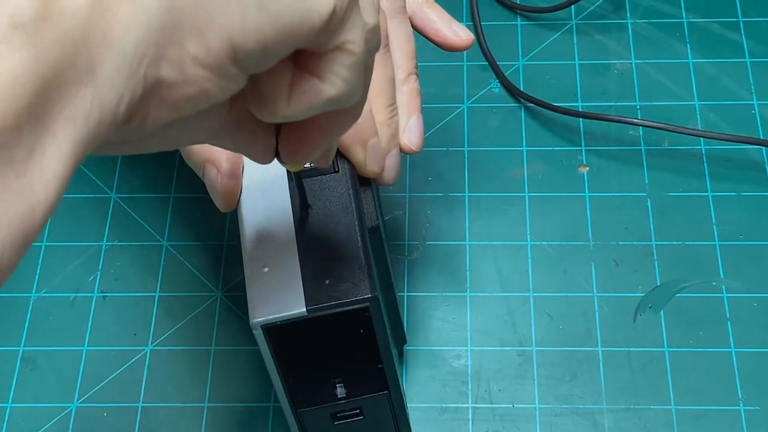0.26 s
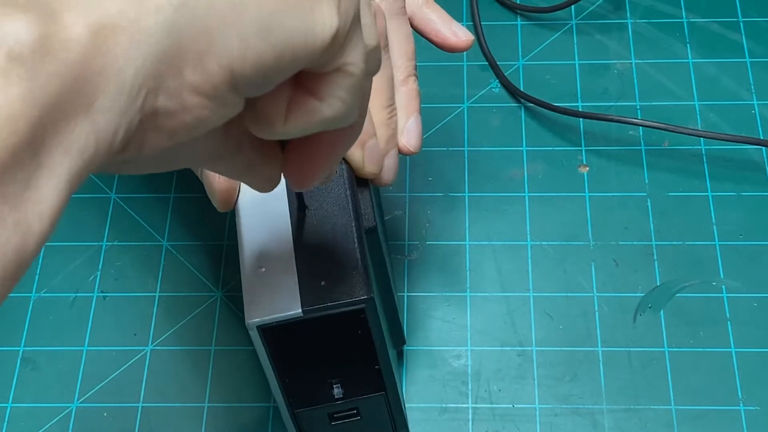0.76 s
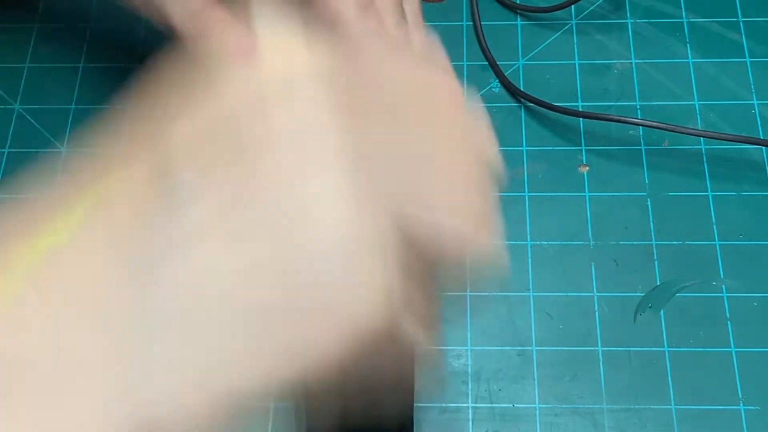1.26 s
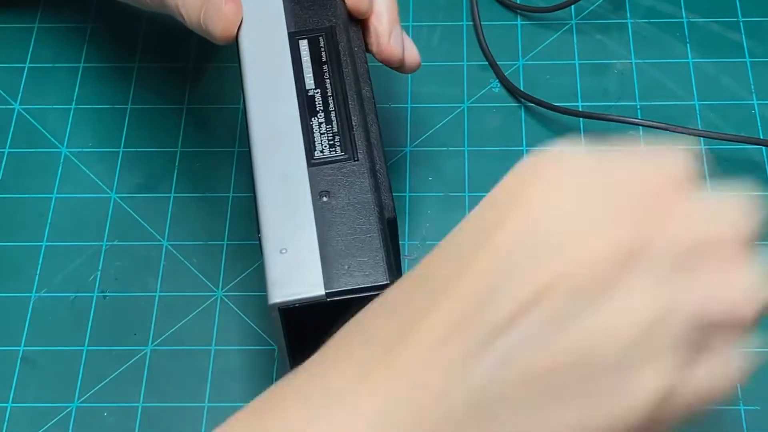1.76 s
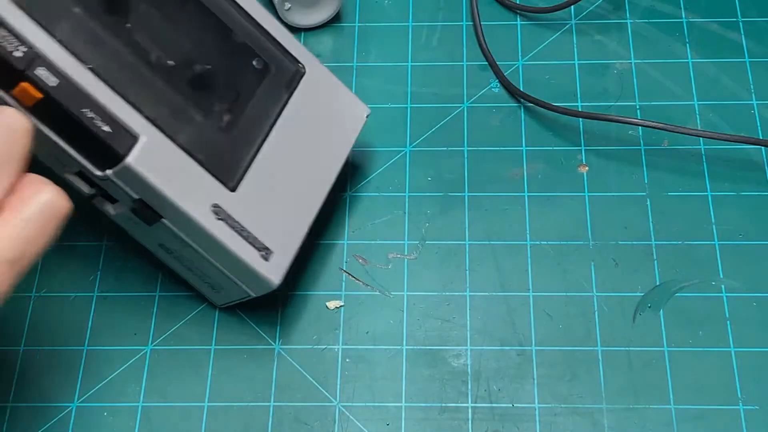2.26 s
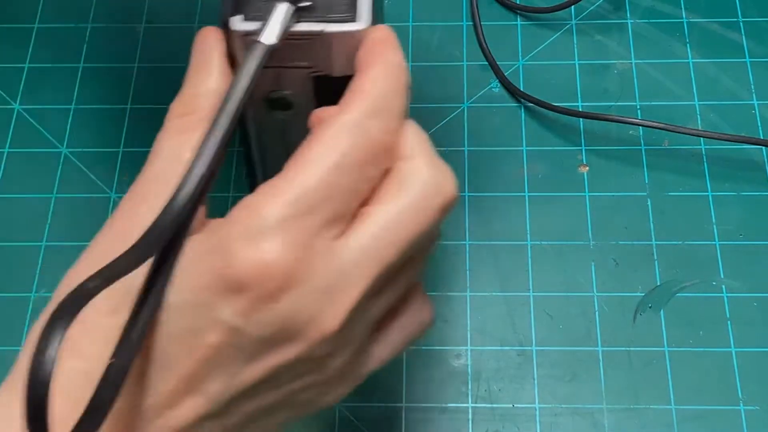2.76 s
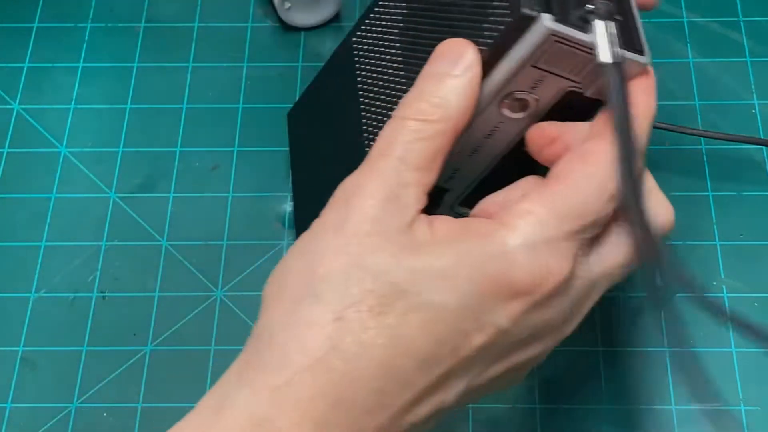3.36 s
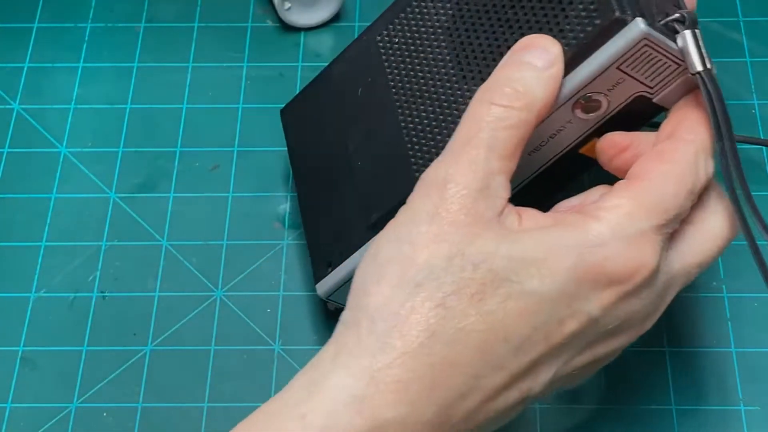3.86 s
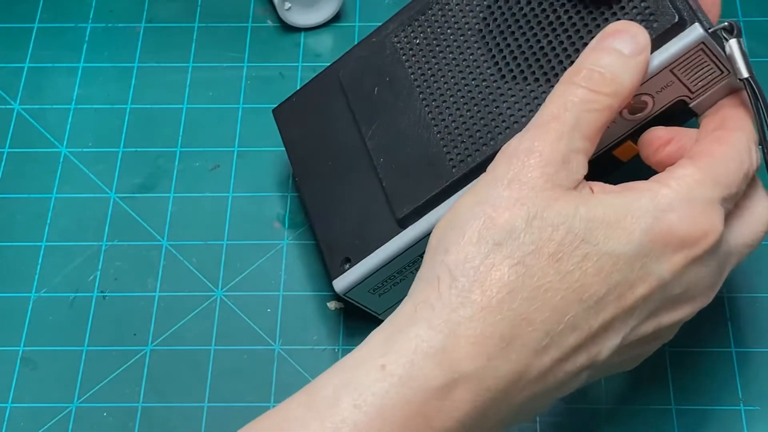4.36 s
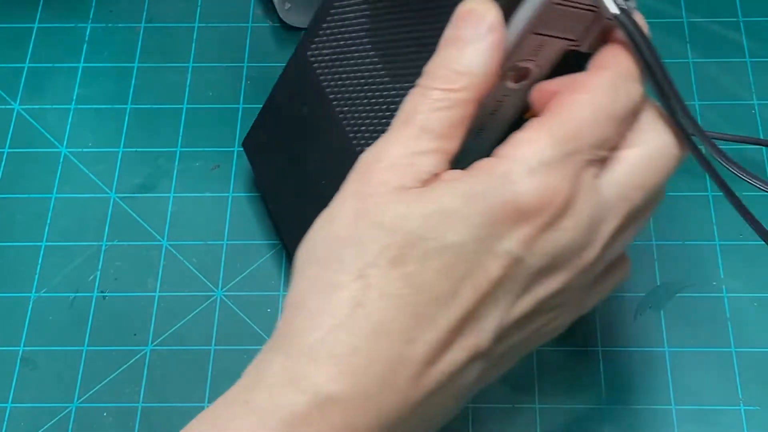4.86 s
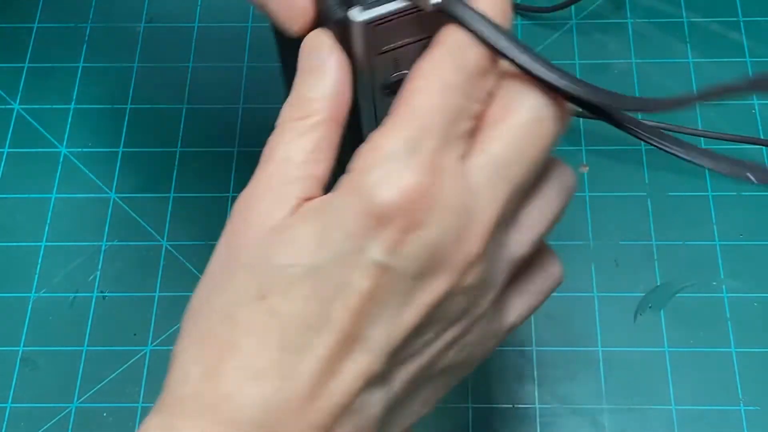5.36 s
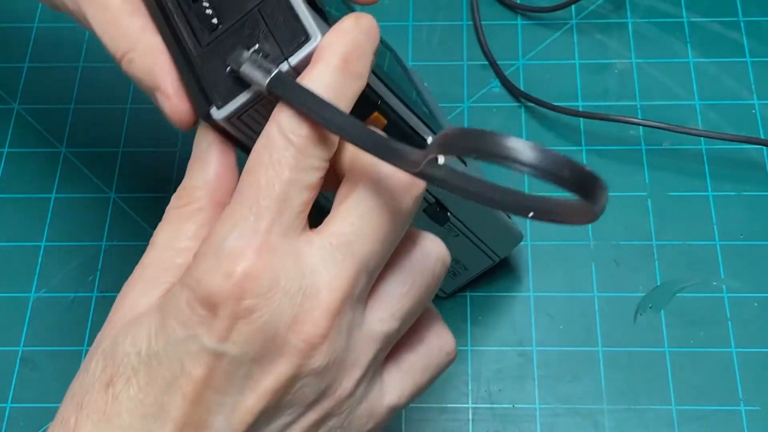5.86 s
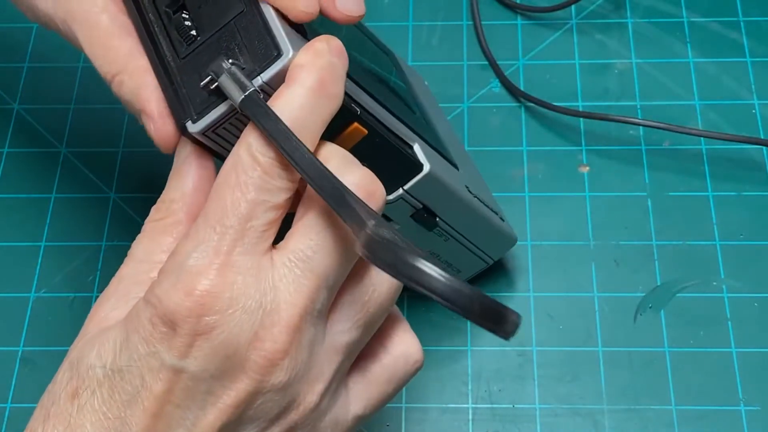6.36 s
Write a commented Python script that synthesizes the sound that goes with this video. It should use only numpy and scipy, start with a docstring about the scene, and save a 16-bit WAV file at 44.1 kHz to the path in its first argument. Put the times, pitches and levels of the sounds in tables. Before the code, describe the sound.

A plastic case clicks, knocks and rubs as it is handled on a workbench, and a screwdriver is set down with a brief ring.

```python
"""A plastic case, a screwdriver and screws click and knock as they are handled on a rubber mat on a bench.
Each impact excites the damped modes of the shell; the screwdriver lands once and its steel rings on.
The wooden bench top thuds under the weight, and sliding fingers and plastic make friction noise.
The small, quiet room adds a short reverberation and a hush. A phone just above the bench hears it all
through two ports, the treble reaching the right side about ten samples early and inverted."""
import sys
import numpy as np
from scipy import signal
from scipy.fft import rfft, irfft, next_fast_len
from scipy.io import wavfile
from scipy.ndimage import uniform_filter1d

SR = 44100
rng = np.random.default_rng(int(sys.argv[2]) if len(sys.argv) > 2 else 0)


def wrap_up_sound(samples):
    """Save the sound to the file named by the first command line argument, as 16-bit audio."""
    columns = np.atleast_2d(samples).T
    # keep every value between -1 and 1, then stretch to whole-number steps
    tamed = np.clip(columns, -1, 1)
    steps = np.round(tamed * 32767).astype(np.int16)
    wavfile.write(sys.argv[1], SR, steps)


N = 291942
PADDED = next_fast_len(N)

# impacts on the case; the hollow, crack and spot levels are relative to the mid-band peak
# (t/s, mid-band peak level/dB, hollow level/dB, crack level/dB, rattle T60/s, spot f/Hz, spot level/dB)
IMPACTS = [(0.944, -38.5, -39, 4, 0.026, 1810, -22), (1.076, -39.5, -2, 6, 0.056, 1160, -12.5),
           (1.1033, -36, -5.5, 13.5, 0.02, 1200, -9), (1.1302, -36, -2.5, 6, 0.033, 2050, -11),
           (1.1769, -34.5, -8, -8, 0.03, 2180, -3), (1.2972, -46, -15, 20, 0.012, 2770, -10),
           (1.4639, -44.5, -4.5, 0, 0.26, 3160, -0.5), (1.4961, -10, -3.5, -2.5, 0.055, 3900, -13),
           (1.5338, -13, 2, -22, 0.053, 1016, -1.5), (1.5427, -5, -4.5, 7, 0.031, 970, -9.5),
           (1.6635, -42, -2, -3, 0.074, 330, -2.5), (2.1489, -38, -0.5, 1.5, 0.061, 996, 1.5),
           (2.5158, -21, -25, 16.5, 0.037, 1260, 2.5), (2.523, -29, -3.5, -21, 0.06, 1263, 13.5),
           (2.5481, -29, -7, -29, 0.027, 1107, 3), (2.6319, -45.5, -39, -22.5, 0.12, 1300, 5),
           (2.7694, -41, 8.5, -7, 0.043, 1240, -6), (2.786, -47.5, 6, -32.5, 0.06, 193.3, 12),
           (3.022, -62, -14.5, -16, 0.031, 947, -1), (3.2079, -61.5, -13, -22, 0.026, 1640, 6),
           (3.3273, -43.5, -26.5, -16, 0.027, 2460, -1), (3.4152, -36, -22.5, -13.5, 0.033, 2093, -6.5),
           (3.9155, -48.5, -15.5, 3, 0.046, 1660, 1.5), (4.3406, -58.5, 11, -34.5, 0.05, 621, 6.5),
           (4.3606, -57.5, 11.5, -35.5, 0.04, 630, 11.5), (4.3745, -58, 8.5, -35, 0.04, 690, 10),
           (4.3850, -63.5, 8, -26, 0.04, 640, 12), (4.3945, -63, 12, -31, 0.025, 402, 8.5),
           (4.4596, -61, 4.5, -13, 0.028, 623, -4), (4.8881, -42, -10.5, 9.5, 0.024, 1980, -14),
           (5.1201, -55, 12, -31, 0.036, 645, 12.5), (5.3614, -40, 2.5, -29, 0.045, 1330, -1),
           (5.3711, -20, -5, -9, 0.045, 1300, -3), (5.6259, -31, -19, 9, 0.016, 2740, -6.5),
           (5.7305, -56.5, -1.5, -30.5, 0.039, 1330, 8), (5.7513, -53.5, -14, -26.5, 0.023, 1080, 7.5),
           (5.9544, -49.5, -21, -21, 0.026, 1430, 2), (6.0068, -46.5, -15, -37, 0.037, 1866, 2),
           (6.171, -59, -16.5, -27, 0.042, 1574, 12.5), (6.2603, -32.5, -14.5, 9.5, 0.025, 2630, -7.5)]
# resonances of the plastic shell (f/Hz, bandwidth/Hz, level/dB)
SHELL_MODES = [(420, 180, 0), (1003, 210, 6), (1336, 140, 4), (1602, 140, 2.5), (1890, 150, 1),
               (2210, 290, -2), (2699.5, 230, 0.5), (3320, 620, -5.5), (4050, 300, -5), (4869, 1300, -9.5),
               (6670, 630, -16), (6850, 900, -18)]
# bright bands of a hard contact (f/Hz, bandwidth/Hz, level/dB)
CONTACT_BANDS = [(9240, 2400, 2), (13000, 670, -2.5)]
# mode clusters of the steel screwdriver (f/Hz, level/dB, T60/s)
STEEL_MODES = [(3000, -8, .4), (5780, -4, .9), (7300, -7, .6), (8400, -6, .8), (9100, 2, .3),
               (10350, -5, .95), (11800, -6, .6), (12900, -3, .8)]
LANDING_S = (1.48, 1.56)  # the impacts in this span ring the screwdriver
# thuds of the bench top (t/s, peak level/dB, f/Hz, T60/s, rise/s)
THUDS = [(0.083, -45.5, 103.7, 0.165, 0.036), (0.222, -51, 82, 0.17, 0.0063),
         (0.486, -52, 74.6, 0.09, 0.0083), (0.559, -54.5, 72.5, 0.14, 0.0096),
         (1.157, -48, 85.85, 0.15, 0.022), (1.199, -49.5, 79.4, 0.17, 0.008),
         (1.366, -51.5, 53.52, 0.2, 0.011), (1.496, -38, 140.8, 0.45, 0.017),
         (1.536, -28.5, 143.1, 0.17, 0.0079), (1.66, -46.5, 87, 0.13, 0.0033),
         (1.761, -59, 68.4, 0.07, 0.0079), (2.408, -49.5, 58.5, 0.25, 0.01), (2.541, -35, 70.8, 0.1, 0.02),
         (2.735, -28.5, 76.65, 0.054, 0.016), (2.784, -25, 99.5, 0.15, 0.0075),
         (3.921, -49, 80.3, 0.22, 0.01), (5.379, -24, 82.24, 0.185, 0.0076), (5.409, -28, 58, 0.13, 0.014),
         (5.71, -61.5, 56.5, 0.15, 0.011)]
# resonances of the bench (f/Hz, bandwidth/Hz, level/dB)
BENCH_MODES = [(59.4, 38, 5), (90, 30, -2), (162, 27, -15.5)]
# rubbing strokes and, at 1.6 and 1.732 s, the noisy fading tail of the screwdriver's landing
# (t/s at full level, 20 dB rise/s, hold/s, 20 dB fall/s, scrape level/dB, hiss level/dB, rumble level/dB)
SWELLS = [(0.0, .01, .002, 0.044, -60.5, -56, -56), (0.124, 0.086, 0.11, .1, -73, -76.5, -70.5),
          (1.07, 0.013, 0.12, 0.089, -54.5, -54, -49.5), (1.183, 0.08, 0.021, 0.26, -60.5, -42, -50),
          (1.337, 0.078, 0.034, 0.25, -67, -62, -68), (1.6, .02, 0.065, 0.11, -51.5, -57, -59),
          (1.732, 0.056, 0.08, 0.28, -58.5, -64, -56), (2.13, 0.085, 0.031, .07, -63, -64, -61),
          (2.403, 0.082, 0.14, 0.033, -66.5, -59, -58.5), (2.588, 0.052, 0.073, 0.3, -54.5, -57, -50),
          (2.84, 0.024, .04, 0.11, -66, -55, -57), (3.025, 0.038, 0.0049, .1, -64.5, -78.5, -64),
          (3.198, 0.033, 0.0044, .08, -68, -88.5, -65), (3.327, 0.046, 0.0059, 0.053, -57.5, -58, -52.5),
          (3.918, .03, 0.026, 0.066, -56, -56, -60.5), (4.221, 0.039, 0.12, .08, -73.5, -71.5, -81),
          (4.36, 0.048, .005, 0.068, -72.5, -80.5, -60.5), (4.993, 0.039, 0.0053, 0.054, -76, -59, -74),
          (5.125, 0.077, .005, 0.057, -68.5, -77, -67), (5.277, 0.028, 0.068, .05, -42.5, -55.5, -70),
          (5.332, 0.041, 0.0043, 0.016, -39, -47, -50), (5.38, 0.0082, 0.033, 0.04, -32, -44.5, -34.5),
          (5.44, 0.026, 0.016, .05, -38, -63, -52), (5.6, 0.11, 0.02, 0.025, -65.5, -75.5, -60.5),
          (5.732, 0.027, .005, 0.12, -66, -80.5, -59), (5.8, .05, 0.084, .05, -71.5, -76.5, -66.5),
          (6.007, .03, 0.0054, 0.038, -57, -87, -58), (6.334, 0.054, .01, .07, -61.5, -60, -68),
          (6.605, 0.13, 0.018, .1, -67, -79, -75)]
SETTLE_DB, SETTLE_FALL_S = (-21, -27.5, -28), 0.058  # scrape, hiss and rumble relative to an impact
SHAKE_DB, SHAKE_FALL = -4.5, 0.21  # rumble relative to a thud; fall as a fraction of its T60
# reverberation time of the room (f/Hz, T60/s)
ROOM_T60 = [(100, 0.047), (300, 0.44), (1000, 0.078), (4000, 0.25), (12000, 0.14)]
# spectral density of the hush (f/Hz, relative level/dB)
HUSH_SPECTRUM = [(18, -33.5), (30, -5.5), (114, -7), (220, -18), (435, -16.5), (796, -21.5), (908, -23),
                 (1240, -25), (11000, -33.5), (13500, -35), (15800, -37.5)]
# phase lag of the right port; above 5 kHz it is about ten samples early and inverted (f/Hz, phase/rad)
PORT_PHASE = [(0, 0), (950, .4), (1700, -1.1), (3050, 1.7), (4300, 0), (5000, -3.5), (16000, -19.2)]
# likeness of the two ports (f/Hz, coherence from 0 to 1)
PORT_COHERENCE = [(100, .98), (300, .92), (700, .62), (3000, .6), (5300, .7), (7000, .99)]
# level difference between the ports (f/Hz, left minus right level/dB)
PORT_BALANCE = [(200, -.5), (600, 2), (1300, 3.3), (2500, 2.8), (5000, .8), (8000, 0)]


def case_clicks(size=4096, rise_s=.0008, first_touch=3.1):
    """Impact excitation: a rattle of contacts drives the shell's modes; hard contact adds treble."""
    t, hz = np.arange(size) / SR, bins(size)
    clicks, landing = np.zeros((2, PADDED + size))
    for start_s, db, hollow_db, crack_db, t60, spot_hz, spot_db in IMPACTS:
        # a soft contact starts more slowly and touches more weakly
        onset = 1 - np.exp(-t / (rise_s * undb(-0.3 * crack_db)))
        rattle = rng.standard_normal(size) * onset * undb(-60 * (t / max(t60, .003)) ** 0.75)
        rattle[8] += first_touch * undb(min(crack_db, 0) / 2)
        # each struck spot drives the modes in its own proportions
        shell = resonances(SHELL_MODES, hz, 3 * rng.standard_normal((len(SHELL_MODES), 1)))
        hollow = filtered(rattle, shell * lowpass(hz, 1100))
        mid = filtered(rattle, shell * highpass(hz, 1200) * lowpass(hz, 14000 * undb(0.4 * crack_db)))
        spot = filtered(rattle, resonances([(spot_hz, 0.1 * spot_hz, 0)], hz))
        treble = highpass(hz, 8800) / (1 + (hz / 15000) ** 8)
        crack = filtered(rattle, treble * (1 + resonances(CONTACT_BANDS, hz)))
        parts = (hollow, hollow_db), (mid, 0), (spot, spot_db), (crack, crack_db)
        click = sum(undb(db + part_db) * part / np.abs(part).max() for part, part_db in parts)
        i = int(start_s * SR)
        clicks[i:i + size] += click
        if LANDING_S[0] < start_s < LANDING_S[1]:
            landing[i:i + size] += click
    return clicks[:PADDED] + screwdriver_ring(landing[:PADDED])


def screwdriver_ring(blows, gain_db=-24, spread=.013):
    """Beating: the blows excite clusters of closely spaced steel modes, which shimmer as they decay."""
    t, ring = np.arange(SR // 2) / SR, 0
    for hz, db, t60 in STEEL_MODES:
        cluster_hz = hz * (1 + spread * rng.standard_normal((10, 1)))
        ring = ring + undb(db - 60 * t / t60) * np.sin(2 * np.pi * cluster_hz * t).sum(axis=0)
    return undb(gain_db) * convolved(blows, ring)


def bench_thuds(size=16384, sag=0.02):
    """Damped oscillation: soft pushes swing the bench top, its pitch sagging slightly at the start."""
    thuds, t = np.zeros(PADDED + size), np.arange(size) / SR
    for start_s, db, hz, t60, rise_s in THUDS:
        cycles = np.cumsum(hz * (1 + sag * np.exp(-t / 0.007))) / SR
        swing = (1 - np.exp(-t / max(rise_s, .002))) * undb(-60 * t / max(t60, .03))
        i = int(start_s * SR)
        thuds[i:i + size] += undb(db) * swing / swing.max() * np.sin(2 * np.pi * cycles)
    return thuds[:PADDED]


def handling_noise():
    """Sliding friction: uneven slips scrape and hiss, the bench rumbles; also the landing's noisy tail."""
    hz = bins(PADDED)
    slips = rng.standard_normal(PADDED) * undb(1.2 * rng.exponential(size=PADDED) + 1.5 * waver(80))
    shell = resonances(SHELL_MODES, hz)
    # sustained rubbing lets the modes build up and stand out
    emphasis = np.abs(shell * undb(3.0 * np.log2(hz / 1000))) ** 0.6
    scrape = unit_rms(filtered(slips, shell * emphasis * highpass(hz, 700) ** 2))
    treble = highpass(hz, 7000) * (1 + 0.5 * resonances([(11300, 3000, 0.0075)], hz))
    hiss = unit_rms(filtered(slips, treble))
    bench = resonances(BENCH_MODES, hz) * lowpass(hz, 250)
    rumble = unit_rms(filtered(rng.standard_normal(PADDED), bench))
    scrape_gain, hiss_gain, rumble_gain = handling_envelopes()
    return scrape_gain * scrape + hiss_gain * hiss + rumble_gain * rumble


def handling_envelopes():
    """Incoherent addition: the swells, parts sliding to rest and the shaken bench sum in power."""
    settles = [(s + 0.0027, .004, 0, SETTLE_FALL_S, *np.add(db, SETTLE_DB)) for s, db, *_ in IMPACTS]
    shakes = [(s + rise_s, rise_s, .012, SHAKE_FALL * t60, -np.inf, -np.inf, db + SHAKE_DB)
              for s, db, _, t60, rise_s in THUDS]
    power = np.zeros((3, PADDED))
    for peak_s, rise_s, hold_s, fall_s, *levels_db in SWELLS + settles + shakes:
        first = max(int((peak_s - 3 * rise_s) * SR), 0)
        last = min(int((peak_s + hold_s + 3 * fall_s) * SR), PADDED)
        t = np.arange(first, last) / SR - peak_s
        drop_db = 20 * np.maximum(np.maximum(-t / rise_s, (t - hold_s) / fall_s), 0)
        power[:, first:last] += undb(np.array(levels_db)[:, None] - drop_db) ** 2
    return np.sqrt(power)


def reverberation(direct, gain_db=-8, rise_s=0.0017):
    """Diffuse field: each octave band of the room's noise-like tail decays at its own rate."""
    t = np.arange(SR // 2) / SR
    hz, tail = bins(len(t)), 0
    for centre_hz in 125 * 2. ** np.arange(8):
        band = filtered(rng.standard_normal(len(t)), np.exp(-2 * np.log2(hz / centre_hz) ** 2))
        tail = tail + band * undb(-60 * t / curve(ROOM_T60, centre_hz))
    return undb(gain_db) * convolved(direct, tail * (1 - np.exp(-t / rise_s)))


def hush(level_db=-65.5):
    """Noise floor: room and microphone give a steady broadband hush whose bass wavers."""
    hz = bins(PADDED)
    noise = unit_rms(filtered(rng.standard_normal(PADDED), undb(curve(HUSH_SPECTRUM, hz))))
    bass = filtered(noise, 1 / (1 + (hz / 250) ** 2))
    return undb(level_db) * (noise - bass + bass * undb(2.5 * waver(6)))


def resonances(modes, hz, extra_db=0):
    """Modal superposition: second-order resonators sum, neighbours in opposite sign."""
    centre, width, db = np.transpose(modes)[:, :, None]
    gain = undb(db + extra_db) * (-1.) ** np.arange(len(centre))[:, None]
    return np.sum(gain * 1j * hz * width / (centre ** 2 - hz ** 2 + 1j * hz * width), axis=0)


def highpass(hz, edge_hz):
    """Critically damped second-order high-pass response."""
    return (1j * hz / (edge_hz + 1j * hz)) ** 2


def lowpass(hz, edge_hz):
    """Critically damped second-order low-pass response."""
    return 1 / (1 + 1j * hz / edge_hz) ** 2


def filtered(x, response):
    """Linear filtering as a product of spectra."""
    return irfft(rfft(x) * response, len(x))


def convolved(x, impulse):
    """Convolution with an impulse response scaled to unit energy."""
    return signal.fftconvolve(x, impulse / np.sqrt(np.sum(impulse ** 2)))[:PADDED]


def waver(rate_hz):
    """Random modulation: held values, smoothed twice, at unit rms."""
    hold = int(SR / rate_hz)
    steps = np.repeat(rng.standard_normal(PADDED // hold + 1), hold)
    return unit_rms(uniform_filter1d(uniform_filter1d(steps, hold), hold)[:PADDED])


def curve(table, hz):
    """Interpolation on a logarithmic frequency axis."""
    table_hz, values = np.transpose(table)
    return np.interp(np.log(hz), np.log(table_hz), values)


def bins(size):
    """Frequencies of a spectrum, at least 1 Hz."""
    return np.maximum(np.arange(size // 2 + 1) * SR / size, 1)


def undb(db):
    """Amplitude ratio of a level."""
    return 10 ** (np.asarray(db) / 20)


def unit_rms(x):
    """Normalisation to an rms of 1."""
    return x / np.sqrt(np.mean(x ** 2))


def scene():
    """Superposition: direct sound, reverberation and hush at two ports, each with its own fine detail."""
    ports = []
    for _ in range(2):
        direct = case_clicks() + bench_thuds() + handling_noise()
        ports.append((direct + reverberation(direct) + hush())[:N])
    return np.array(ports)


def record(dry, top_hz=16000):
    """Partial coherence: the right port shares the left's sound, phase-shifted; both are band-limited."""
    hz = bins(PADDED)
    coherence = curve(PORT_COHERENCE, hz)
    phase_shift = np.exp(-1j * np.interp(hz, *np.transpose(PORT_PHASE)))
    tilt = undb(curve(PORT_BALANCE, hz) / 2)
    left, right_own = rfft(dry, PADDED) * highpass(hz, 25) ** 2 / (1 + (hz / 15600) ** 16)
    right = (coherence * left + np.sqrt(1 - coherence ** 2) * right_own) * phase_shift
    stereo = irfft([left * tilt, right / tilt], PADDED)[:, :N]
    top_cut = signal.ellip(10, .2, 45, top_hz, fs=SR, output="sos")
    return signal.sosfilt(top_cut, np.clip(stereo, -1, 1))


dry = scene()
out = record(dry)
wrap_up_sound(out)
```